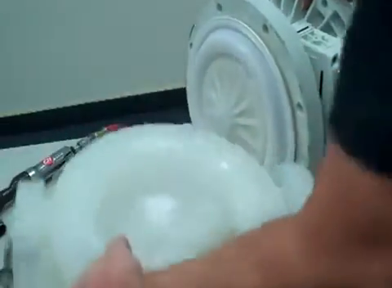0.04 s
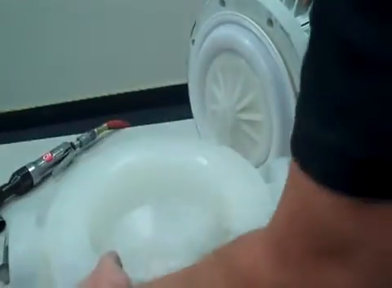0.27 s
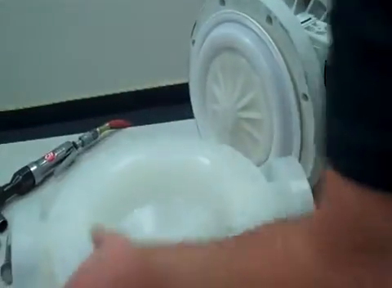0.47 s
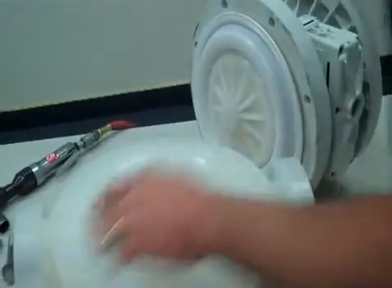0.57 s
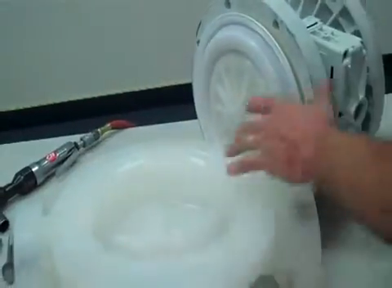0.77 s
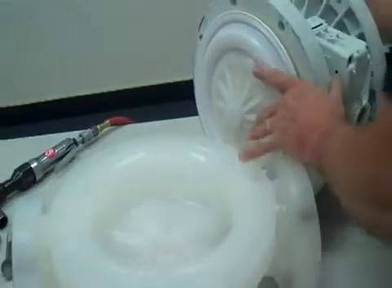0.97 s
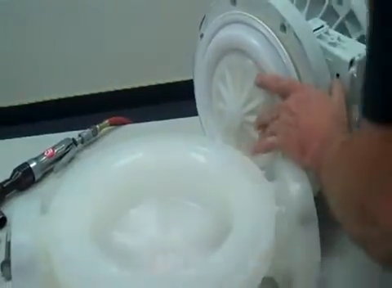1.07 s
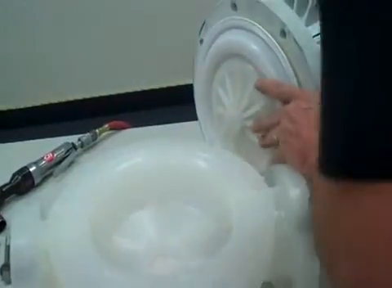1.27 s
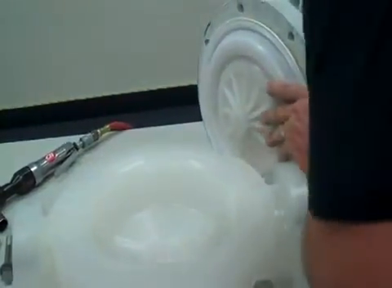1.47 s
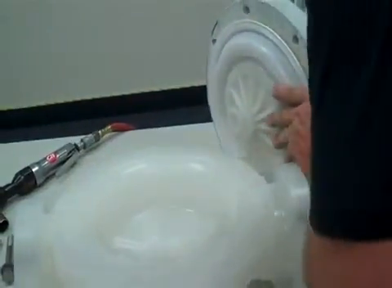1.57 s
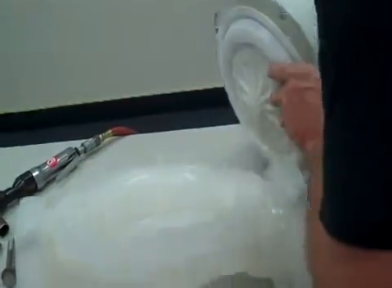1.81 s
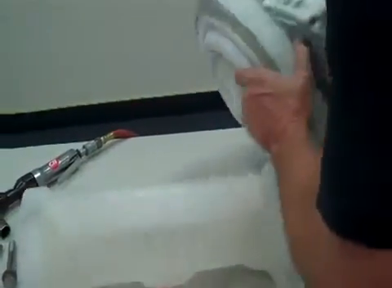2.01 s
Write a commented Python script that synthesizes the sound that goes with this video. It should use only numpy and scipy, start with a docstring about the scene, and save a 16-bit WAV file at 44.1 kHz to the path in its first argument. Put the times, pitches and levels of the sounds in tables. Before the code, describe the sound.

A hollow plastic pump housing scrapes to a juddering stop on a workbench, then knocks hard in a chattering, overloaded clatter; softer taps, bumps and short scrapes follow, close up in a small room with faint hum.

```python
"""A workbench in a small room, heard close up: a heavy hollow plastic pump housing is set down on it.
Its rim judders to a stop, then a chattering knock rings the housing, jingles tools and overloads the input.
Hands then shift the parts: light taps, short scrapes, soft bumps and a sleeve's rustle over a faint hum.
Ringing is made of dying sine waves and dying noise; cloth and air are coloured noise; the hum is two sines."""
import sys
import numpy as np
from scipy import signal
from scipy.fft import rfft, irfft
from scipy.io import wavfile

SR = 44100
rng = np.random.default_rng(int(sys.argv[2]) if len(sys.argv) > 2 else 0)


def generate_wav(signal):
    """Clip the signal to [-1, 1] and save it as 16-bit WAV at the path in sys.argv[1]."""
    frames = np.transpose(np.atleast_2d(signal))
    scaled = np.clip(frames, -1, 1) * 32767
    pcm = np.round(scaled).astype(np.int16)
    wavfile.write(sys.argv[1], SR, pcm)


N = 90404
T = np.arange(SR) / SR  # one second of time, in s

# In all tables t60 is the time to fade by 60 dB; levels in noise spectra and ringing are relative.
# clearest ringing tones of the housing: f/Hz, level/dB, t60/s
SHELL = [(143.5, -11, .35), (200, -14, .45), (287, -8, .3), (398, 2, 0.1), (445, -3, .14), (477, -6, .33),
         (545, -4, .14), (595, 3, 0.13), (715, -4, .16), (749, 1, 0.15), (818, -3, .15), (953, -2, .14),
         (1003, -2, 0.14), (1062, -1, 0.14), (1113, -3, .14), (1178, -2, .13), (1285, -2, .15),
         (1561, -4, 0.17), (1638, -1, 0.17), (1882, -6, .17), (2260, -7, 0.15), (2414, -3, 0.16)]
# the housing's crowd of weaker tones, a noise spectrum: f/Hz, level/dB per Hz
BODY = [(30, -24.5), (70, -18.5), (140, -8), (260, -5), (340, -7), (420, -0.5), (700, -5), (1400, -5),
        (2600, -8), (4500, -11), (7500, -22), (14000, -44.5)]
# how long the crowd of tones lasts in a tap, scrape or judder slip: f/Hz, t60/s
CLICK_T60 = [(300, 0.15), (2000, 0.056), (10000, 0.042)]


def amp(db):
    """Turns decibels into a gain."""
    return 10 ** (np.asarray(db) / 20)


def unit(x):
    """Scales a sound to an rms level of 1."""
    return x / np.sqrt(np.mean(x ** 2) + 1e-20)


def read(points, hz):
    """Reads values between the points of a table, on a log-frequency axis."""
    f, value = np.transpose(points)
    return np.interp(np.log(hz + 1), np.log(f + 1), value)


def add(mix, s, sound):
    """Mixes a stereo sound in at time s, cutting off what runs past the end."""
    start = max(round(s * SR), 0)
    part = mix[:, start:][:, :sound.shape[1]]
    part += sound[:, :part.shape[1]]


def noise(spectrum, size):
    """Coloured noise at two microphone ports, whose likeness depends on the pitch."""
    # likeness of left and right, 1 = identical, 0 = unrelated: f/Hz, likeness
    likeness = [(30, -0.18), (120, 1), (500, 0.93), (1200, .85), (2500, 0.57), (5000, 0.26), (9000, -0.05),
                (14000, 0)]
    hz = np.fft.rfftfreq(size, 1 / SR)
    a, b = np.exp(2j * np.pi * rng.random((2, len(hz))))  # random phases
    alike = np.clip(read(likeness, hz), -1, 1)
    right = alike * a + np.sqrt(1 - alike ** 2) * b
    return unit(irfft(np.array([a, right]) * amp(read(spectrum, hz)), size))


def dying(spectrum, t60s):
    """A crowd of tones that start at once, as noise in which each band dies at its own speed."""
    z = rfft(noise(spectrum, SR))
    hz = np.fft.rfftfreq(SR, 1 / SR)
    centres = [f for f, _ in t60s]
    out = np.zeros((2, SR))
    # each share is 1 at its own band centre and 0 at the others, so the bands overlap smoothly
    for share, (_, t60) in zip(np.eye(len(t60s)), t60s):
        band = irfft(z * read(list(zip(centres, share)), hz), SR)
        out += band * amp(-60 * T / t60)
    return out


def ring(modes, start=0):
    """Half a second of dying sines, in step with ringing begun start seconds ago; slightly later at right."""
    port_delay_s = .00003
    t = np.array([T, T - port_delay_s])[:, :SR // 2]
    sound = np.zeros_like(t)
    for hz, db, t60 in modes:
        sound += amp(db - 60 * t / t60) * np.sin(2 * np.pi * hz * (t + start))
    return np.pad(sound, ((0, 0), (0, SR - SR // 2)))


def lowpass(x, hz, order=1):
    """Takes treble away, as a softer contact does."""
    return signal.sosfilt(signal.butter(order, min(hz, .45 * SR), fs=SR, output="sos"), x)


def focus(x, hz, octaves, order=1):
    """Keeps a band around hz, reaching further down than up: small contacts sound high, large ones low."""
    edges = [hz / 2 ** octaves, min(hz * 2 ** (octaves / 2), .47 * SR)]
    return signal.sosfilt(signal.butter(order, edges, "band", fs=SR, output="sos"), x)


def stroke(length):
    """The quick swell and slow fade of one hand movement."""
    return np.sin(np.pi * np.linspace(0, 1, round(length * SR)) ** 0.25)


def plastic_part(grit_db=0):
    """One touch of a plastic part: a crowd of weak tones (the grit) and clear dying sines."""
    # the crowd of weak tones: f/Hz, level/dB per Hz
    grit = [(100, -15), (500, -8.5), (1200, -2.5), (2400, -2.5), (3600, -1.5), (4900, -3), (5700, -14),
            (9500, -8.5), (15000, -40.5)]
    # the clear tones: f/Hz, level/dB, t60/s
    tones = [(530, -12, .18), (736, -10, .1), (834, -13.5, 0.081), (1018, -6.5, .1), (1310, 0.5, 0.085),
             (1425, -3.5, .1), (1643, -4.5, 0.22), (1940, 1.5, 0.055), (2180, -6.5, .09), (2650, -5, .09),
             (3280, -2, 0.041), (3495, 1, 0.02), (3880, 1, 0.07), (4270, 1, 0.056), (4780, 0, 0.033)]
    return amp(grit_db) * dying(grit, CLICK_T60) + amp(-10.5) * ring(tones)


def room(x):
    """Echoes too dense to tell apart: the sound is smeared over a dying noise tail."""
    # colour of the tail: f/Hz, level/dB
    colour = [(100, -7), (200, 2), (380, 1), (520, 2), (1500, -5), (5000, -7), (10000, -0.5)]
    # how long the tail lasts: f/Hz, t60/s
    tail_t60 = [(100, 0.87), (500, 0.6), (2000, 0.75), (5000, 0.61), (12000, 0.22)]
    gap_s = 0.0062  # silence before the echoes, then their fade-in over the same time
    tail = dying(colour, tail_t60) * np.clip(T / gap_s - 1, 0, 1)
    return signal.fftconvolve(x, tail / np.linalg.norm(tail[0]), axes=1)[:, :N]


def background():
    """Ventilation and hiss as steady coloured noise, and mains hum as two sines that waver together."""
    # ventilation and hiss: f/Hz, level/dB per Hz
    air = [(25, -1.5), (60, -8), (150, -10), (400, -10), (1000, -19.5), (3000, -19), (6000, -22),
           (10500, -29.5), (13000, -41.5), (16000, -56)]
    # hum before it wavers: f/Hz, rms level/dB
    hum_tones = [(59.2, -69.5), (118.4, -69)]
    # change of the hum's level over time: t/s, level/dB
    waver = [(0.92, -6.5), (1.05, 5.5), (1.85, 0), (2.0, 3.5)]
    t = np.arange(N) / SR
    hum = np.zeros(N)
    for hz, db in hum_tones:
        hum += amp(db) * np.sqrt(2) * np.sin(2 * np.pi * (hz * t + rng.random()))
    return amp(-57.5) * noise(air, N) + hum * amp(np.interp(t, *np.transpose(waver)))


def rustles():
    """Sleeve and hands brush past: cloth hisses as noise that swells and fades."""
    # brushes: start t/s, length/s, level/dB
    brushes = [(0.0, 0.59, -56), (0.799, 0.067, -58), (1.052, 0.061, -58.5), (1.238, 0.18, -58),
               (1.531, 0.054, -54.5), (1.847, 0.074, -60)]
    # colour of the hiss: f/Hz, level/dB per Hz
    cloth = [(200, -10), (1500, -0.5), (4000, 1.5), (7000, -4.5), (10500, -5.5), (14000, -25.5)]
    out = np.zeros((2, N))
    for s, length, db in brushes:
        swell = stroke(length)
        add(out, s, amp(db) * swell * noise(cloth, len(swell)))
    return out


def bumps():
    """Soft bumps of hands and housing: padded contacts start gently and stir mostly low tones."""
    # bumps: t/s, level/dB
    contacts = [(0.672, -53), (0.991, -52.5), (1.32, -53.5), (1.419, -47.5), (1.48, -51.5), (1.61, -57),
                (1.865, -66)]
    # colour of a bump: f/Hz, level/dB per Hz
    thud = [(40, -11), (100, -5), (170, 7.5), (320, -2), (520, 2), (900, -6.5), (2500, -29)]
    # how long a bump lasts: f/Hz, t60/s
    thud_t60 = [(100, 0.26), (1000, 0.38)]
    out = np.zeros((2, N))
    for s, db in contacts:
        fade_in = np.minimum(T / 0.008, 1)
        add(out, s, amp(db) * dying(thud, thud_t60) * fade_in)
    return out


def scrapes():
    """Parts slide in runs of tiny random slips, each of which rings the plastic part."""
    # scrapes: start t/s, length/s, level/dB, treble corner f/Hz
    slides = [(0.817, 0.054, -49, 2650), (0.858, 0.072, -50.5, 1720), (1.061, 0.044, -50, 2200),
              (1.252, 0.17, -58, 2420), (1.542, 0.05, -39.5, 1800), (1.603, 0.066, -45, 1870),
              (1.85, 0.039, -55, 800)]
    slips_per_s, slip_range_db = 1900, 17  # average rate; strongest slip against weakest
    out = np.zeros((2, N))
    for s, length, db, hz in slides:
        swell = stroke(length)
        chance, size, sign = rng.random((3, len(swell)))
        happens = chance < slips_per_s / SR
        slips = unit(happens * amp(slip_range_db * size) * np.sign(sign - .5))
        part = lowpass(plastic_part(grit_db=1), hz, order=2)
        part /= np.linalg.norm(part[0])
        add(out, s, amp(db) * signal.fftconvolve((slips * swell)[None], part, axes=1))
    return out


def taps():
    """Light taps of plastic on plastic: each rings the part within its own band of pitch."""
    # taps: t/s, level/dB, band position f/Hz, band reach downwards/octaves
    contacts = [(0.0224, -32, 4370, 2.8), (0.498, -47, 7008, 1.95), (0.7294, -51, 8995, 2.4),
                (0.818, -51, 6000, 1.8), (0.8633, -43, 1820, 1.2), (0.9391, -41, 7000, 1.7),
                (0.9444, -47.5, 6040, 1.7), (1.3015, -51, 4400, .4), (1.3219, -41, 3430, 0.19),
                (1.3231, -45, 6000, 3.5), (1.363, -47, 4550, 0.65), (1.4154, -34.5, 3100, 2.06),
                (1.495, -38.5, 1960, 1.22), (1.5385, -43.5, 5140, 1.3)]
    out = np.zeros((2, N))
    for s, db, hz, octaves in contacts:
        add(out, s, amp(db) * focus(plastic_part(), hz, octaves, order=2))
    return out


def judder():
    """The dragged rim sticks and slips on the bench, slower, weaker and duller until it stops."""
    # what each slip stirs: the bench top flexing (short low tones) and a long-ringing tone of the housing near
    # 486 Hz: f/Hz, level/dB, t60/s
    slip_tones = [(150, 3, 0.02), (280, 3.5, 0.0095), (486.4, -7.5, 0.26), (570, -6, 0.025)]
    rate_hz, slowing_hz_per_s, stop_s = 320, 1950, .105
    level_db, fade_db_per_s = -29.5, -53.5
    treble_hz, dulling_s = 2200, 0.028  # first treble corner, and the time at which it has halved
    out, s = np.zeros((2, N)), 0
    modes = amp(-22.5) * ring(SHELL) + ring(slip_tones)
    for jitter in rng.standard_normal(26):
        if s >= stop_s:
            break
        slip = dying(BODY, CLICK_T60) + modes
        corner_hz = treble_hz / (1 + (s / dulling_s) ** 2)
        add(out, s, amp(level_db + fade_db_per_s * s) * lowpass(slip, corner_hz))
        # the wait for the next slip varies at random by about 4 %
        s += (1 + 0.04 * jitter) / max(rate_hz - slowing_hz_per_s * s, 60)
    return signal.sosfilt(signal.butter(2, 70, "high", fs=SR, output="sos"), out)


def knocks():
    """The housing chatters on the bench: each contact rings its hollow shell and the tools nearby."""
    # contacts with the bench: t/s, level/dB, treble corner f/Hz
    contacts = [(0.2099, 0, 4460), (0.2138, 1.5, 788.4), (0.2237, 0, 3550), (0.2404, -4, 8966),
                (0.252, -5.5, 219.7), (0.254, -11, 8976), (0.273, -18, 8000), (0.289, -16, 6850),
                (0.301, -21, 5950)]
    # how long the housing's weaker tones last: f/Hz, t60/s
    body_t60 = [(100, .16), (500, 0.17), (2000, 0.23), (5000, 0.19), (12000, 0.14)]
    # steel tools shaken on the bench: f/Hz, level/dB, t60/s
    tools = [(4323, -27, 0.15), (4657, -27, 0.15), (8926, -38, 0.16), (9930, -33, .16), (10010, -33, .18),
             (10110, -32, 0.17), (10620, -40, .2), (12330, -37, .14)]
    out = np.zeros((2, N))
    for s, db, hz in contacts:
        since = s - contacts[0][0]  # keeps every ringing in step with the first
        modes = amp(-19.5) * ring(SHELL, since) + ring(tools, since)
        add(out, s, amp(db) * lowpass(dying(BODY, body_t60) + modes, hz))
    return out


def scene():
    """Everything on the bench, with the room's echoes, louder on the left."""
    # tilt to the left: f/Hz, level/dB added at left and taken away at right
    left_tilt = [(40, 2), (200, 1.9), (500, 2), (1200, 2.5), (2500, 3), (6000, 2), (12000, 0)]
    light = rustles() + bumps() + scrapes() + taps()
    drag = judder()
    heavy = knocks()
    echoes = room(amp(-21.5) * heavy + amp(-9) * (light + drag))
    mix = background() + light + drag + heavy + echoes
    left_db = read(left_tilt, np.fft.rfftfreq(N, 1 / SR))
    return irfft(rfft(mix) * amp([left_db, -left_db]), N)


def record(dry):
    """The input flattens peaks near full scale, then a filter removes the highest treble."""
    knee = 24  # a higher number bends the peaks more sharply
    clipped = dry / (1 + abs(dry) ** knee) ** (1 / knee)
    treble_cut = signal.firwin(127, 15800, window=("kaiser", 7), fs=SR)  # corner at 15800 Hz
    return signal.oaconvolve(clipped, treble_cut[None], "same")


dry = scene()
out = record(dry)
generate_wav(out)
```